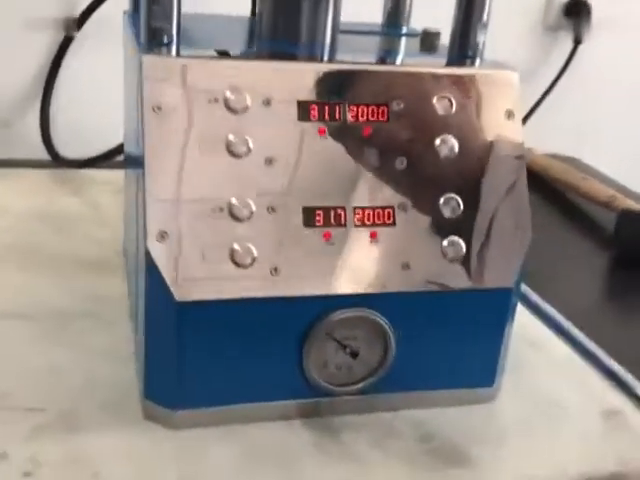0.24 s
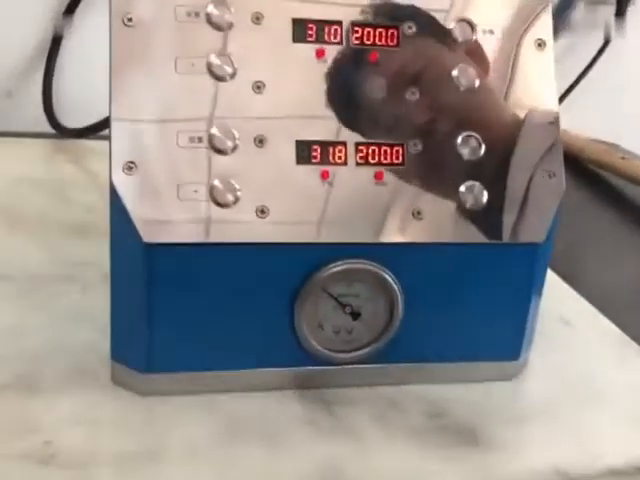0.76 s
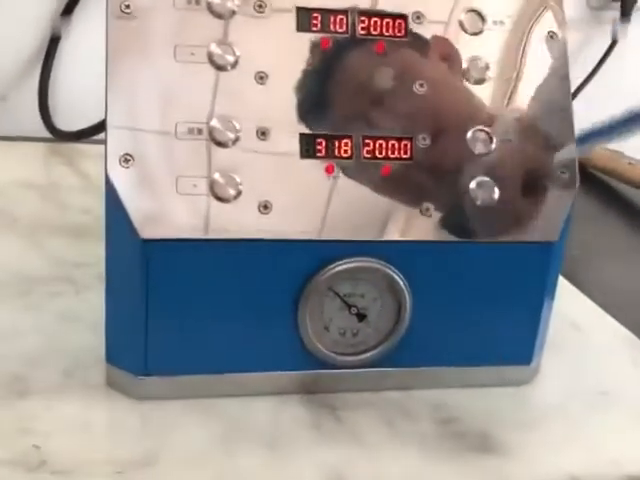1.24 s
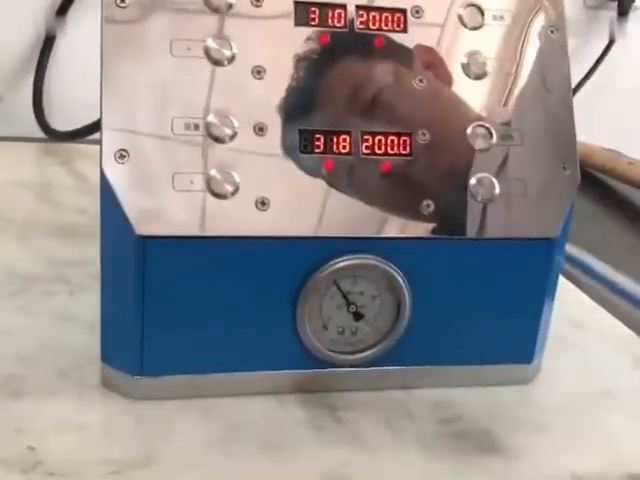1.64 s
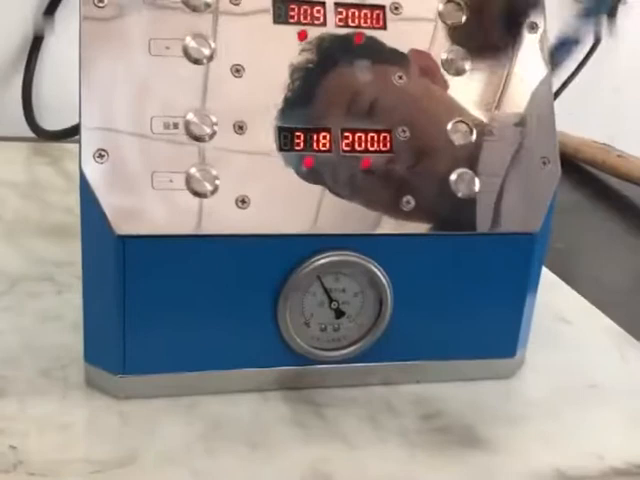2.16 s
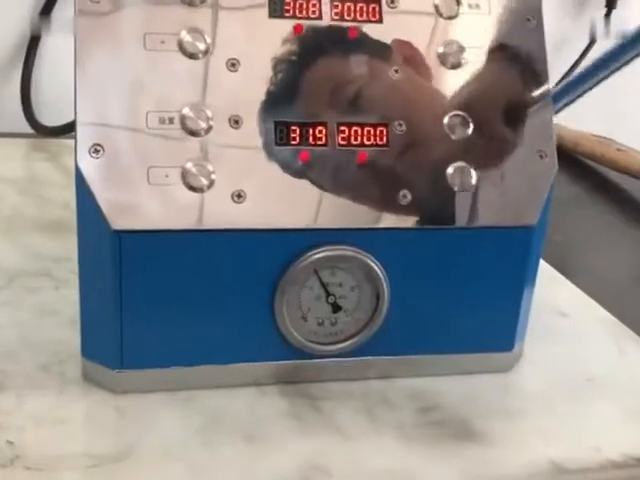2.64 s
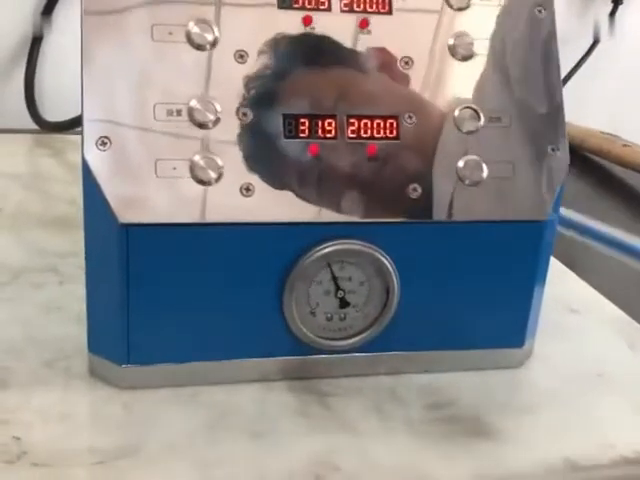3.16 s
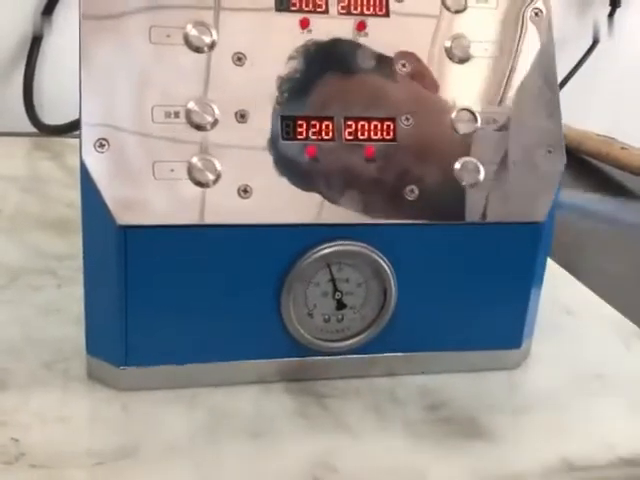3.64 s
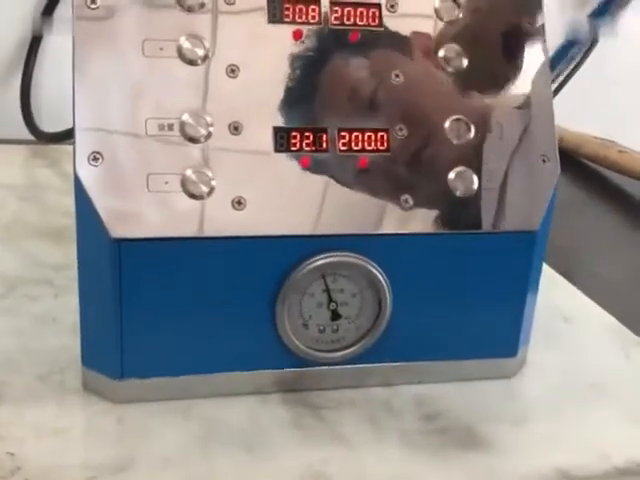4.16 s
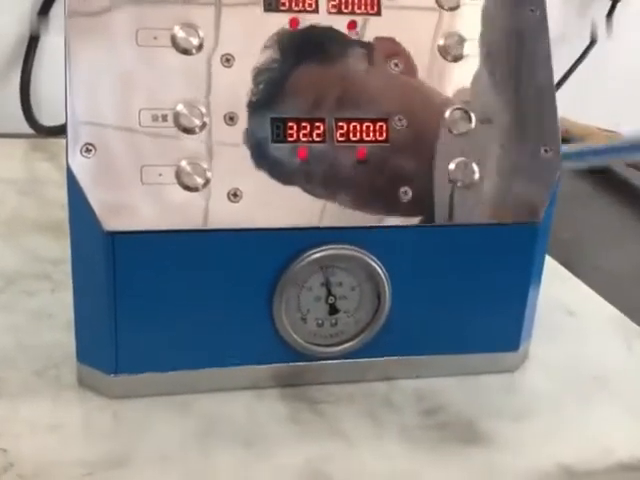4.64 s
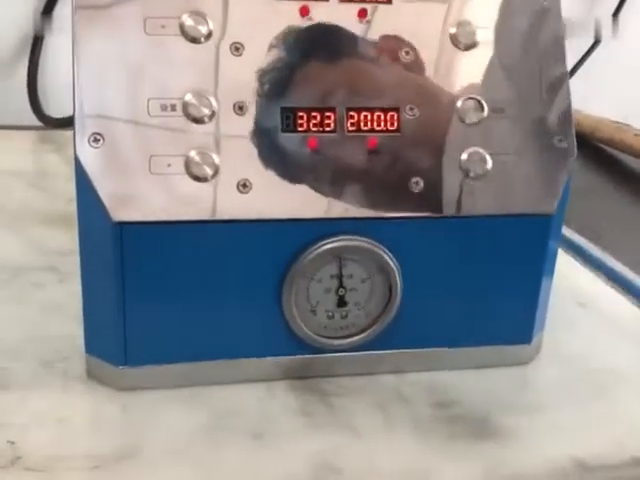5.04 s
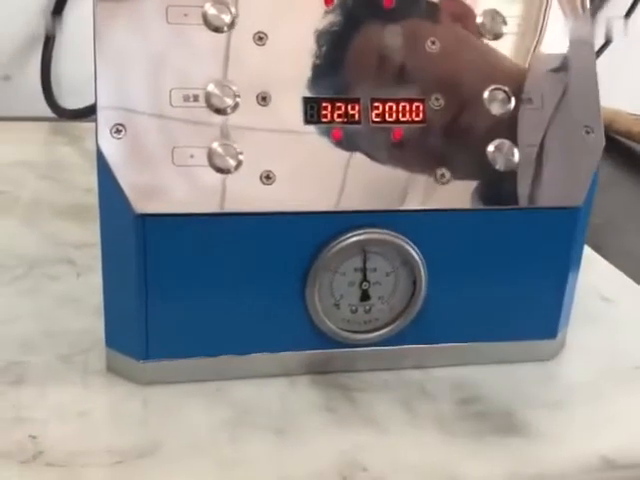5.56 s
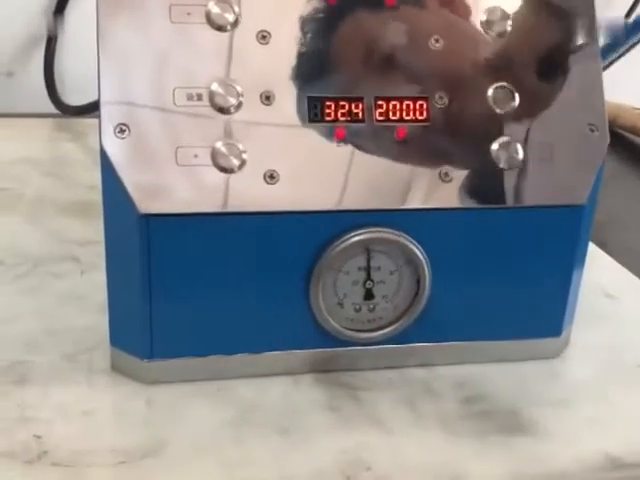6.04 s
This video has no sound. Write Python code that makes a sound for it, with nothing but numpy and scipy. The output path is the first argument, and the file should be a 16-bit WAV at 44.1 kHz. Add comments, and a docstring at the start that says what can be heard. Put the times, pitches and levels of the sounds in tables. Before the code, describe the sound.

A steel lever is worked by hand in a small, lightly reverberant laboratory, heard close up. Grainy friction swells and eases with each stroke, with small catches. Loose joints tick and the frame thuds softly at the turns. A tiny squeal comes early, a double clank at about two seconds, more quiet knocks, then a rasping squeak and the brightest, hardest clank just after five seconds, over steady low room noise.

```python
"""A soft, grainy rubbing over low room noise comes first, then dry steel screeches; a second screech comes later.
A small hydraulic press is being pumped by hand on a stone bench in a laboratory. Friction noise follows the strokes.
The lever knocks in its loose pivot at the turns, and twice clanks hard against its stop and rebounds: each blow
is a sum of decaying modes and filtered noise. Stick-slip makes the screeches: two squeals breaking up into a rasp.
Diffuse reverberation follows the knocks, clanks and screeches."""
import sys
import numpy as np
from scipy import signal
from scipy.fft import rfft, irfft, next_fast_len
from scipy.io import wavfile
from scipy.ndimage import uniform_filter1d

SR = 44100
rng = np.random.default_rng(int(sys.argv[2]) if len(sys.argv) > 2 else 0)


def wav_record(signal):
    """Record a signal, one row per channel, as 16-bit PCM in the file named by sys.argv[1]."""
    frames = np.transpose(np.atleast_2d(signal))
    bounded = np.clip(frames, -1, 1)
    # unit amplitude maps onto the largest positive 16-bit level
    quanta = np.round(bounded * 32767).astype(np.int16)
    wavfile.write(sys.argv[1], SR, quanta)


N = 277697
TIME = np.arange(N) / SR
AGE = np.arange(SR // 2) / SR   # time since a blow, s


def amp(db):
    """Level to amplitude: 20 dB is a factor of ten."""
    return 10 ** (np.asarray(db) / 20)


def rms_one(x):
    """Normalization to unit mean power."""
    return x / np.sqrt(np.mean(x ** 2) + 1e-20)


def dying(t60):
    """Exponential decay: 60 dB are lost in t60 seconds."""
    return np.exp(-np.log(1000) * AGE / t60)


def ramp(start_s, length_s):
    """Linear onset: a rise from 0 to 1 over a length of time."""
    return np.clip((TIME - start_s) / length_s, 0, 1)


def at_hz(points, hz):
    """Interpolation of a table on a logarithmic frequency axis."""
    f, value = np.transpose(points)
    return np.interp(np.log(np.maximum(hz, 1)), np.log(f), value)


def cut(x, hz, kind, order=2):
    """Butterworth filtering: a maximally flat passband."""
    edge = np.clip(hz, 10, SR / 2 - 500)
    return signal.sosfilt(signal.butter(order, edge, kind, fs=SR, output="sos"), x + 1e-18)


def coloured(x, spectrum):
    """Spectral shaping: weight each frequency by a smooth curve, then set the rms to 1."""
    size = next_fast_len(len(x))
    gain = amp(at_hz(spectrum, np.fft.rfftfreq(size, 1 / SR)))
    shaped = irfft(rfft(x, size) * gain, size)
    return rms_one(shaped[:len(x)])


def drift(hz):
    """Slow random modulation: straight lines between random knots, 2 hz knots a second; rms 1."""
    knots = rng.standard_normal(int(N / SR * 2 * hz) + 2)
    return rms_one(np.interp(TIME * 2 * hz, np.arange(len(knots)), knots))


def add(track, s, sound):
    """Superposition: lay a sound into a track at a time."""
    start = int(s * SR)
    track[start:start + len(sound)] += sound[:N - start]


# spectrum of the room's air noise: f/Hz, level/dB (per Hz)
AIR_COLOUR = [(15, -38.5), (25, -24.5), (48, -3), (114, -6), (214, -2.5), (300, -10.5), (325, -10.5),
              (400, -11.5), (609, -12), (791, -17.5), (950, -20.5), (1200, -20.5), (3080, -24),
              (11700, -35.5), (13000, -46)]


def air_noise(level_db):
    """Stationary random noise: a steady spectrum, here weighted to the bass."""
    return amp(level_db) * coloured(rng.standard_normal(N), AIR_COLOUR)


# decay of the laboratory's reverberation: f/Hz, t60/s
ROOM_DECAY = [(150, 0.47), (800, 0.42), (2200, 0.01), (5000, 0.5), (12000, 0.37)]
# strength of the reverberation in each band: f/Hz, level/dB
ROOM_LEVEL = [(150, 5.5), (800, 2), (2200, -5), (5000, -6.5), (12000, -6)]


def laboratory(x, wet_db, build_s):
    """Diffuse reverberation: noise that builds up and decays at a rate set by its frequency band."""
    edges, tail = np.geomspace(80, 16000, 13), 0
    for low, high in zip(edges, edges[1:]):
        hz = np.sqrt(low * high)
        envelope = dying(at_hz(ROOM_DECAY, hz)) * (1 - np.exp(-(AGE / build_s) ** 2))
        band = cut(rng.standard_normal(len(AGE)), [low, high], "band")
        tail = tail + amp(at_hz(ROOM_LEVEL, hz)) * band * envelope / np.linalg.norm(envelope)
    return x + amp(wet_db) * signal.fftconvolve(x, tail)[:N]


def widen(x, side_db, above_hz):
    """Interaural decorrelation: scattered early reflections make only the treble differ left to right."""
    early = rng.standard_normal(len(AGE)) * dying(.012) * (AGE > .0005)
    scatter = cut(early, above_hz, "high", order=6)
    side = amp(side_db) * signal.fftconvolve(x, scatter / np.linalg.norm(scatter))[:N]
    return np.array([x + side, x - side])


def slips(per_s, spread_db):
    """Poisson-like impulses: tiny random slips of uneven size and either sign."""
    happens = rng.random(N) < per_s / SR
    size = amp(spread_db * np.minimum(rng.exponential(1, N), 4))
    return happens * rng.choice([-1, 1], N) * size


# spectrum of the rubbing: f/Hz, level/dB (per Hz)
RUB_SPECTRUM = [(300, -18), (600, -1), (1100, 2), (1900, 1.5), (3000, -1.5), (4500, -5), (7000, -16.5),
                (11000, -17), (13000, -28)]
# the lever rubs as it travels: start t/s, length t/s, level/dB (before easing, catches and the overall trim)
RUB_STROKES = [(0.0, 0.52, -51), (0.888, .45, -59), (1.71, .4, -55.5), (2.726, .55, -56),
               (3.397, 0.36, -60), (4.361, .85, -52.5), (5.25, .42, -52.5), (5.918, 0.4, -63.5)]
# single catches of the rubbing: t/s, level/dB
SINGLE_CATCHES = [(2.876, -49.5), (2.915, -47), (3.066, -51), (4.508, -56), (4.665, -48), (4.834, -50),
                  (5.548, -56), (6.008, -52)]
# friction builds up, then eases by this much over the stroke
STROKE_SWELL_S, STROKE_EASE_DB, STROKE_RELEASE_S = 0.1, 6, 0.12
IDLE_RUB_DB = -67.5   # between strokes, before the overall trim
CATCHES_PER_S, CATCH_DB, CATCH_T60_S = 32, 2, 0.031   # smaller random catches, scaled to the stroke's rubbing


def rubbing(trim_db, waver_db):
    """Sliding friction: many tiny slips, swelling with each stroke, with catches that let go."""
    travel = np.zeros(N)
    for s, length, db in RUB_STROKES:
        eased = amp(db - STROKE_EASE_DB * ramp(s, length))
        release = 1 - ramp(s + length - STROKE_RELEASE_S, STROKE_RELEASE_S)
        travel += eased * ramp(s, STROKE_SWELL_S) * release
    catch = dying(CATCH_T60_S) * (1 - np.exp(-AGE / .001))
    moments = (rng.random(N) < CATCHES_PER_S / SR) * rng.uniform(0.61, 1, N)
    small_catches = signal.fftconvolve(moments, catch)[:N]
    pressure = amp(IDLE_RUB_DB) + travel * (1 + amp(CATCH_DB) * small_catches)
    pressure *= amp(trim_db + waver_db * drift(35))
    for s, db in SINGLE_CATCHES:
        add(pressure, s, amp(db) * catch)
    return pressure * coloured(slips(per_s=5000, spread_db=1.5), RUB_SPECTRUM)


def squeal(pitch_hz, jitter, flutter_db, octave_db):
    """Self-excited vibration: a friction-driven mode of unsteady pitch and strength, and its octave."""
    phase = 2 * np.pi * np.cumsum(pitch_hz * (1 + jitter * drift(900))) / SR
    wave = np.sin(phase) + amp(octave_db) * np.sin(2 * phase)
    return wave * np.sqrt(2) * amp(flutter_db * drift(200))


# resonances of the scraped steel: f/Hz, bandwidth f/Hz, level/dB (mean, before hopping and the rasp's spectrum)
STEEL_RESONANCES = [(2410, 92, -6), (3930, 42, -2.5), (4600, 42, 2.5), (5100, 55, -3), (5960, 50, -1.5),
                    (6170, 71, -2), (6600, 40, 1.5), (8600, 40, -2.5), (10000, 110, 4.5), (10550, 53, 1),
                    (11100, 69, -1.5), (12930, 120, -1)]
# spectrum of the rasp: f/Hz, level/dB (per Hz)
RASP_SPECTRUM = [(150, -19.5), (600, -16.5), (900, -9.5), (1200, -2), (1900, -5.5), (2900, -1),
                 (4300, -4.5), (6300, 2), (8300, -0.5), (9300, -1), (10500, 1), (11500, 0), (13000, -7)]


def rasp(per_s, unevenness, grit_db, ring_db, hop_db):
    """Forced resonance: uneven slips and fine grit shake the steel; energy hops between sharp resonances."""
    cycles = np.cumsum(per_s * np.exp(unevenness * drift(1500))) / SR
    # one pulse each time a slip cycle is completed
    pulses = rms_one(cut(np.diff(np.floor(cycles), prepend=0), 300, "high"))
    force = pulses + amp(grit_db) * rng.standard_normal(N)
    rings = np.zeros(N)
    for hz, width, db in STEEL_RESONANCES:
        b, a = signal.iirpeak(hz, hz / width, fs=SR)
        rings += amp(db + hop_db * drift(25)) * signal.lfilter(b, a, force)
    unsteady = amp(1.3 * drift(170))
    return coloured((force + amp(ring_db) * rings) * unsteady, RASP_SPECTRUM)


# stick-slip screeches: squeal starts t/s, contact breaks up t/s, lets go t/s, pitch f/Hz and slip rate f/Hz
# (both before the sag), squeal level/dB (before softening and fade), lower squeal level/dB at break-up,
# its growth/(dB/s), rasp level/dB at break-up, its growth/(dB/s)
STICK_SLIPS = [(0.132, .136, .179, 5377, 2200, -27, -32.5, -280, -26.5, -190),
               (4.879, 4.902, 4.986, 4925, 1650, -22.5, -31.5, 70, -21.5, -10)]
SQUEAL_ATTACK_S, RASP_ATTACK_S, RELEASE_DB_PER_S = .008, 0.0013, 649.5
# the squeal is softer before the break-up and fades after it
CLEAN_SQUEAL_DB, SQUEAL_FADE_DB_PER_S = -5.5, 90
CLEAN_RASP_DB = -27   # extra level of the rasp before the break-up
PITCH_SAG, SLIP_SAG, SAG_S = .04, .33, .035   # shares lost as the slide slows, and its time constant


def screeches(lower_ratio, mixing_db):
    """Stick-slip: a clean squeal starts, breaks up into a rasp, and sags in pitch as the slide slows."""
    out = np.zeros(N)
    for (start, breaks, ends, pitch, per_s, squeal_db,
         lower_db, lower_growth, rasp_db, rasp_growth) in STICK_SLIPS:
        sliding = np.clip(TIME - breaks, 0, ends - breaks)
        slowed = 1 - np.exp(-sliding / SAG_S)
        broken = ramp(breaks, RASP_ATTACK_S)
        release = amp(-RELEASE_DB_PER_S * np.clip(TIME - ends, 0, 1))
        contact = ramp(start, SQUEAL_ATTACK_S) * release
        upper = amp(squeal_db + CLEAN_SQUEAL_DB * (1 - broken) - SQUEAL_FADE_DB_PER_S * sliding)
        lower = broken * amp(lower_db + lower_growth * sliding)
        rough = amp(rasp_db + rasp_growth * sliding + CLEAN_RASP_DB * (1 - broken))
        # the more the rasp prevails, the less steady the squeals
        chaos = rough / (rough + upper + 1e-9)
        pitch_hz = pitch * (1 - PITCH_SAG * slowed)
        high = squeal(pitch_hz, jitter=.06 * chaos, flutter_db=3.8 * chaos, octave_db=-18.5)
        low = squeal(pitch_hz * lower_ratio, jitter=.045 * chaos, flutter_db=5.1 * chaos, octave_db=-24.5)
        slip_rate = per_s * (1 - SLIP_SAG * slowed)
        scrape = rasp(slip_rate, unevenness=.1, grit_db=-0.5, ring_db=5.5, hop_db=4.0)
        # friction couples the two squeals into a tone at the sum of their pitches
        sum_tone = amp(mixing_db) * cut(high * low, 3000, "high")
        out += contact * (upper * high + lower * low + rough * (scrape + sum_tone))
    return out


def unit_attack(x, size=176):
    """Short-time power: scale a blow so that its loudest 4 ms have rms 1."""
    return x / np.sqrt(uniform_filter1d(x ** 2, size).max())


def struck(modes, scatter_db, contact_s):
    """Modal superposition: each blow rings the modes in its own mix, building up over the contact time."""
    hz, db, t60 = np.transpose(modes)[:, :, None]
    strength = amp(db + scatter_db * rng.standard_normal(hz.shape))
    phase = rng.uniform(0, 2 * np.pi, hz.shape)
    rings = np.sum(strength * dying(t60) * np.sin(2 * np.pi * hz * AGE + phase), axis=0)
    return unit_attack(rings * (1 - np.exp(-AGE / contact_s)))


# spectrum of a steel-on-steel crack: f/Hz, level/dB (per Hz)
CRACK_SPECTRUM = [(300, -22.5), (700, -8), (1300, -6.5), (1850, -5), (2200, -1), (2700, -6), (3450, 2),
                  (4100, -4.5), (5200, -3.5), (6000, -5.5), (8100, -3.5), (10000, -4.5), (13000, -13.5)]


def crack(contact_s, t60, buzz_db, buzz_t60):
    """High modal density heard as noise: a quickly damped snap, then the fading buzz of loose parts."""
    decay = dying(t60) + amp(buzz_db) * dying(buzz_t60)
    build_up = 1 - np.exp(-(AGE / contact_s) ** 2)
    return unit_attack(coloured(rng.standard_normal(len(AGE)), CRACK_SPECTRUM) * decay * build_up)


# modes of the pivot: f/Hz, level/dB, t60/s
PIVOT_MODES = [(2176, -3, .03), (2290, -4, .018), (3260, 2.5, 0.014), (3600, -4, 0.017),
               (4100, -16.5, 0.063), (4180, -14, 0.072), (5230, -2.5, 0.0087)]


def pivot_click(contact_hz, ring_db):
    """Impact with a low-pass contact spectrum: a small rattling click of the pin in its hole."""
    click = crack(contact_s=0.00094, t60=0.016, buzz_db=-11.5, buzz_t60=0.12)
    click += amp(ring_db) * struck(PIVOT_MODES, scatter_db=0.5, contact_s=0.00088)
    return cut(click, contact_hz, "low", order=3)


# main modes of the press frame: f/Hz, level/dB, t60/s
FRAME_MODES = [(285, -13.5, 0.05), (395, -9.5, 0.047), (523, -9.5, .04), (593, -3, 0.078),
               (650.5, 0, 0.056), (708, -3.5, 0.062), (773, -5.5, 0.035), (871, -7, 0.037),
               (1110, -11.5, 0.033), (1346, -10.5, 0.027), (1573, -11.5, 0.062)]


def thud(clatter_db):
    """Modal response: the frame's main modes ring over a short clatter of crowded weaker ones."""
    clatter = unit_attack(cut(rng.standard_normal(len(AGE)) * dying(.04), [330, 1500], "band"))
    return unit_attack(struck(FRAME_MODES, scatter_db=2, contact_s=0.0012) + amp(clatter_db) * clatter)


# modes of the bench: f/Hz, level/dB, t60/s
BENCH_MODES = [(163.8, -1, 0.16), (188, -4.5, 0.085), (217, -1.5, 0.12), (272, -2, 0.12),
               (336.6, -7, 0.093)]
# the lever takes up the load and jolts the press: t/s, frame level/dB, bench thump level/dB
LOAD_THUDS = [(.388, -38, -53.5), (.785, -49, -61), (.938, -51.5, -50.5), (.961, -54, -46.5),
              (1.083, -41, -48.5), (2.774, -43.5, -59.5), (3.672, -64, -50), (4.481, -39.5, -52.5),
              (6.185, -46, -41)]
THUD_CLICK_DB = -21.5   # pivot click, relative to the frame
# the slack lever taps in its pivot: t/s, lever ring level/dB, click level/dB
LEVER_TAPS = [(.388, -45.5, -40), (.506, -48, -70), (.599, -55.5, -66), (.824, -45.5, -55),
              (.852, -50.5, -61), (1.821, -58, -59), (1.903, -47, -48.5), (2.076, -44, -66),
              (2.436, -56, -78), (3.569, -52.5, -40.5), (3.603, -38, -44.5), (3.750, -49.5, -57),
              (4.165, -51, -71), (5.235, -48, -47.5), (5.844, -49, -53)]
TAP_FRAME_DB, TAP_BENCH_DB = -3.5, -9   # what a tap passes on, relative to the lever ring


def knocks():
    """Structure-borne impact: under load the lever jolts frame and bench; slack, it taps in its pivot."""
    out = np.zeros(N)
    for s, frame, bench in LOAD_THUDS:
        add(out, s, amp(frame) * thud(clatter_db=-3.5))
        add(out, s, amp(bench) * struck(BENCH_MODES, scatter_db=3.5, contact_s=0.0028))
        add(out, s, amp(frame + THUD_CLICK_DB) * pivot_click(contact_hz=4700, ring_db=-5.5))
    for s, lever, click in LEVER_TAPS:
        add(out, s, amp(lever + TAP_FRAME_DB) * thud(clatter_db=-2.0))
        add(out, s, amp(lever + TAP_BENCH_DB) * struck(BENCH_MODES, scatter_db=2, contact_s=0.0027))
        add(out, s, amp(click) * pivot_click(contact_hz=4193, ring_db=-2))
    return out


# hard clanks and their rebounds: t/s, crack level/dB (before the contact low-pass), lever ring level/dB,
# frame level/dB (before its high-pass), rattle level/dB (relative to the crack), contact cutoff f/Hz,
# low ping level/dB, high ping f/Hz, high ping level/dB
STOP_CLANKS = [(1.9374, -16.5, -24, -29.5, -33, 5500, -32, 3460, -19),
               (1.9567, -18.5, -31, -28.5, -24, 4760, -28, 3554, -21.5),
               (5.2684, -12, -27, -30.5, -18.5, 12000, -17.5, 3330, -17),
               (5.3007, -20.5, -28, -32, -18.5, 2800, -25.5, 3270, -40),
               (5.3416, -32.5, -38.5, -38, -9, 8000, -37, 3320, -53)]


def clanks(bench_db, pivot_db):
    """Contact stiffness: steel hits the stop, and a harder contact has a higher cutoff, a brighter crack."""
    out = np.zeros(N)
    for s, snap, _, frame, rattle, contact_hz, *_ in STOP_CLANKS:
        steel = crack(contact_s=.0007, t60=.012, buzz_db=rattle, buzz_t60=.19)
        steel += amp(pivot_db) * struck(PIVOT_MODES, scatter_db=-2.5, contact_s=.0005)
        add(out, s, amp(snap) * cut(steel, contact_hz, "low"))
        add(out, s, amp(frame + bench_db) * struck(BENCH_MODES, scatter_db=1.5, contact_s=0.0027))
        # so brief a blow hardly moves the lowest modes of the frame
        add(out, s, amp(frame) * cut(thud(clatter_db=-1), 560, "high", order=3))
    return out


# modes of the lever: f/Hz, level/dB, t60/s
LEVER_MODES = [(964, 0, .055), (1000, -6, .045), (925, -9, .04)]
TAP_PING_DB = -14   # the lever's low ping, relative to its ring


def lever_rings(low_ping_hz, ping_t60):
    """Free vibration: taps and clanks ring the lever; clanks add a higher ping, set by where it seats."""
    out = np.zeros(N)
    for s, lever, _ in LEVER_TAPS:
        add(out, s, amp(lever) * struck(LEVER_MODES, scatter_db=0.5, contact_s=0.0046))
        ping = struck([(low_ping_hz, 0, ping_t60)], scatter_db=0, contact_s=0.002)
        add(out, s, amp(lever + TAP_PING_DB) * ping)
    for s, _, lever, _, _, _, low_ping, ping_hz, high_ping in STOP_CLANKS:
        add(out, s, amp(lever) * struck(LEVER_MODES, scatter_db=2.5, contact_s=0.0055))
        for hz, db in (low_ping_hz, low_ping), (ping_hz, high_ping):
            add(out, s, amp(db) * struck([(hz, 0, ping_t60)], scatter_db=0, contact_s=0.00089))
    return out


def scene():
    """Superposition of sources: the reverberant press, the dry rubbing and the steady air noise."""
    air = air_noise(level_db=-58)
    rub = rubbing(trim_db=-6.0, waver_db=3.0)
    friction = laboratory(screeches(lower_ratio=.805, mixing_db=-11.5), wet_db=-12.5, build_s=0.012)
    blows = knocks() + clanks(bench_db=-13.0, pivot_db=-9.5)
    impacts = laboratory(blows, wet_db=-9.0, build_s=0.008)
    rings = laboratory(lever_rings(low_ping_hz=2202, ping_t60=0.016), wet_db=-12, build_s=0.0063)
    return widen(impacts + rings + friction + rub + air, side_db=-11, above_hz=5230)


CEILING, CUTOFF_HZ = .93, 13200   # full-scale fraction; upper band limit


def record(dry):
    """Soft saturation and band limiting: the highest peaks are rounded and the top is cut steeply."""
    rounded = dry / (1 + (dry / CEILING) ** 8) ** (1 / 8)
    return signal.sosfilt(signal.ellip(10, .2, 80, CUTOFF_HZ, fs=SR, output="sos"), rounded)


dry = scene()
out = record(dry)
wav_record(out)
```